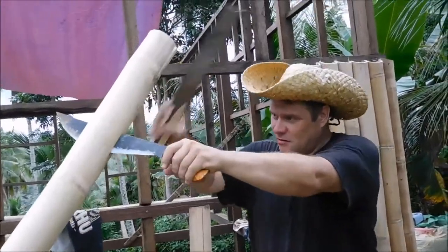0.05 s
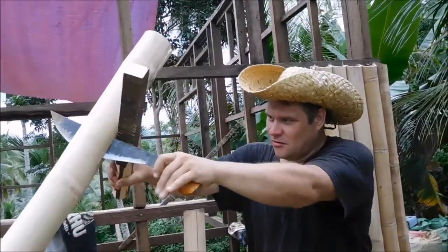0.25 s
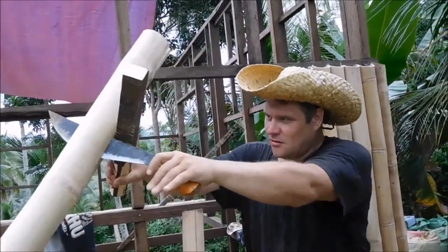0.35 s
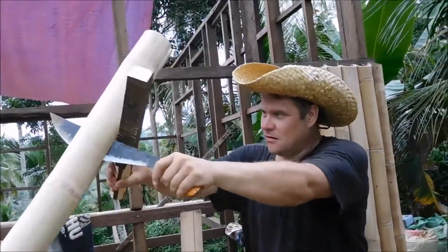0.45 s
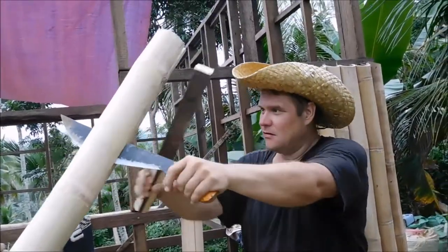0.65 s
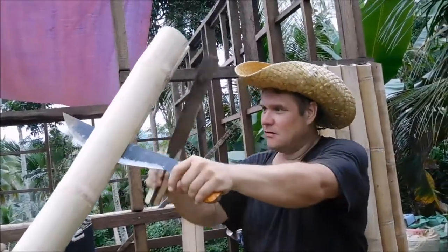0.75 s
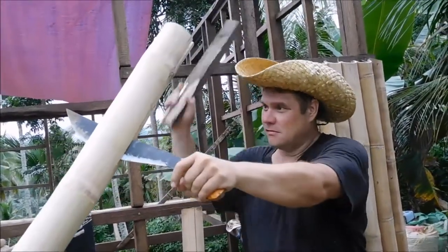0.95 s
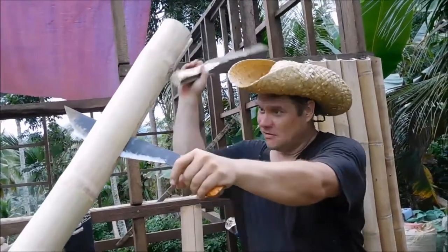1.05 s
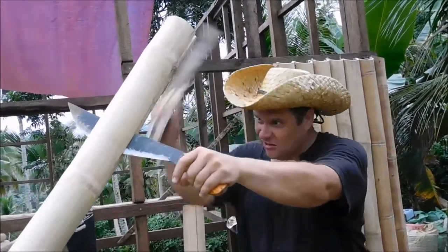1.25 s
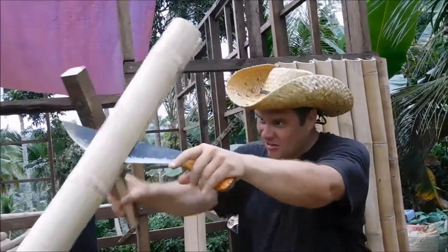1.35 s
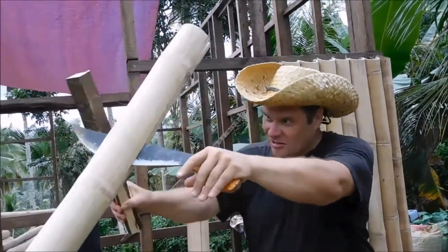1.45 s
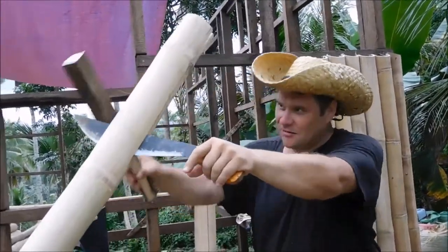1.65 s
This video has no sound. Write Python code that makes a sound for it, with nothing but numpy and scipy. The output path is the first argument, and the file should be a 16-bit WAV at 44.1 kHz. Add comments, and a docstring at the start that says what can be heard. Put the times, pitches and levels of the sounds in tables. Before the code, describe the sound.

Two sharp wooden knocks on a blade wedged in a bamboo pole, about a second apart, heard close outdoors. A hollow knock comes first, then a splitting crack with a short metallic ring, over a faint hush and thin insect hiss.

```python
"""First comes the hush of a quiet yard, with thin insect hiss and a faint handling rustle.
Then a wooden block strikes a knife blade lodged in a bamboo pole, twice. The first blow drives the
blade in and sounds the hollow pole. The second cracks harder, splits the pole so it rings lower,
leaves the blade ringing and ends in dull knocks. Nearby walls and timber scatter the sound,
and the close microphone overloads on each blow."""
import sys
import numpy as np
from scipy import signal
from scipy.io import wavfile

SR = 44100
rng = np.random.default_rng(int(sys.argv[2]) if len(sys.argv) > 2 else 0)


def to_wav(s):
    """Save 16-bit WAV."""
    ch = np.atleast_2d(s).T  # columns
    pcm = np.round(np.clip(ch, -1, 1) * 32767)  # PCM
    wavfile.write(sys.argv[1], SR, pcm.astype(np.int16))


N = 74970


def from_db(db):
    """Turn decibels into a number to multiply by."""
    return 10 ** (np.asarray(db) / 20)


def rms_one(x):
    """Scale a signal so its average strength (rms) is one."""
    return x / np.sqrt(np.mean(x ** 2) + 1e-20)


def at_hz(table, hz, column=1):
    """Read between a table's rows, spacing octaves evenly."""
    table = np.array(table)
    return np.interp(np.log(hz), np.log(table[:, 0]), table[:, column])


def pan_left(db):
    """Turn the left side up and the right side down by db."""
    return from_db([[db], [-db]])


def fade(start, t60):
    """Jump to one at start, then die away by 60 dB every t60 seconds."""
    age = np.arange(N) / SR - start
    return (age >= 0) * from_db(-60 * np.maximum(age, 0) / t60)


def drift(hz):
    """A slow random wander, about one in size."""
    r = np.exp(-2 * np.pi * hz / SR)
    return rms_one(signal.lfilter([1], [1, -2 * r, r * r], rng.standard_normal(2 * N))[N:])


def ring(push, hz, t60):
    """Each push starts a pure tone that dies away."""
    decay, turn = from_db(-60 / (t60 * SR)), 2 * np.pi * hz / SR
    return signal.lfilter([0, np.sin(turn)], [1, -2 * decay * np.cos(turn), decay ** 2], push + 1e-18)


def struck(times, levels_db, tones):
    """One click per contact rings all of an object's natural tones."""
    clicks = np.zeros(N)
    clicks[(times * SR).astype(int)] = from_db(levels_db)
    return sum((-1) ** k * from_db(db) * ring(clicks, hz, t60) for k, (hz, db, t60) in enumerate(tones))


def half_octave(x, hz):
    """Keep a band half an octave wide around hz."""
    half = 2 ** .25
    return signal.sosfilt(signal.butter(2, [hz / half, hz * half], "band", fs=SR, output="sos"), x)


def noise_bands(likeness):
    """Stereo noise, band by band; likeness 1 makes left and right equal, 0 unrelated."""
    white = rng.standard_normal((2, 2, N))
    for k, hz in enumerate(30 * 2 ** (np.arange(19) / 2)):
        mid, side = half_octave(white[k % 2], hz)
        alike = np.clip(at_hz(likeness, hz), -1, 1)
        yield hz, np.sqrt((1 + alike) / 2) * mid + np.sqrt((1 - alike) / 2) * side * [[1], [-1]]


# tone colour of the outdoor hush: f/Hz, level/dB
HUSH_COLOUR = [(25, 3), (45, -5), (100, -6.5), (250, -10.5), (450, -11.5), (950, -10), (1500, -13.5),
               (3000, -17), (6500, -25), (10500, -28), (15500, -32.5)]
# how alike the hush is in both ears: f/Hz, likeness
HUSH_LIKENESS = [(60, 0.92), (240, 0.56), (950, 0.45), (3770, -0.14), (15000, 0.016)]
def hush(level_db=-49.5, flicker_db=1.2):
    """The hush of the yard wavers slightly in each band."""
    bands = (from_db(at_hz(HUSH_COLOUR, hz) + flicker_db * drift(hz=14)) * band
             for hz, band in noise_bands(HUSH_LIKENESS))
    return from_db(level_db) * rms_one(sum(bands))


def insects(hz=10650, width_hz=760, level_db=-67.5):
    """Distant insects make a thin, steady hiss."""
    band = signal.butter(2, [hz - width_hz / 2, hz + width_hz / 2], "band", fs=SR, output="sos")
    return from_db(level_db) * rms_one(signal.sosfilt(band, rng.standard_normal((2, N))))


# faint ticks and rustles: t/s, level/dB, f/Hz, fade time/s, hiss compared with ring/dB
SCUFFS = [(0.04, -55, 3200, .4, -7), (0.722, -55, 7500, .04, 5), (0.76, -56, 4500, .25, -5),
          (1.234, -42, 3050, .035, -3)]
def handling():
    """Handling makes tiny scuffs: hiss with one blurry ringing pitch."""
    out = 0
    for start, db, hz, t60, hiss_db in SCUFFS:
        hiss = rng.standard_normal((2, N))
        ringing = rms_one(ring(hiss, hz, t60=.005))
        out += from_db(db) * fade(start, t60) * (ringing + from_db(hiss_db) * hiss)
    return out


# natural tones of the hollow pole before it splits: f/Hz, level/dB, fade time/s
POLE_TONES = [(626.4, -16.5, .19), (673, -21, 0.179), (709, -9.5, .14), (722.5, -31, .7),
              (770.3, -7, 0.094), (932, -3, 0.076), (1032, -16, 0.11), (1109, -16, 0.1)]
def pole(times, levels_db, split_s=1.3, split_pitch=.885):
    """The bamboo rings at one pitch while whole, and lower once the second blow splits it."""
    split = times > split_s
    lowered = [(hz * split_pitch, db, t60) for hz, db, t60 in POLE_TONES]
    whole = struck(times[~split], levels_db[~split], POLE_TONES)
    return whole + struck(times[split], levels_db[split], lowered)


# how alike the close bursts are in both ears: f/Hz, likeness
BURST_LIKENESS = [(60, 1), (700, 1), (2000, 0.83), (5000, 0.26), (14000, 0.48)]
def bursts(times, levels_db, colour, t60):
    """Many crowded, short-lived tones blur into a burst of noise at each contact."""
    noise = rms_one(sum(from_db(at_hz(colour, hz)) * band for hz, band in noise_bands(BURST_LIKENESS)))
    power = sum((from_db(db) * fade(start, t60)) ** 2 for start, db in zip(times, levels_db))
    return noise * np.sqrt(power)


# contacts within the two blows: t/s, then level/dB of pole, block, blade, crack, rasp, thump
BLOW_CONTACTS = [(0.2015, -21.5, -8, -38, -25, -12, -37.5), (0.2023, -31.5, -6.5, -28, -25, -7, -35),
                 (0.2070, 3, -12.5, -28, -31, -11, -16.5), (0.2172, -21, -12.5, -44, -28, -17, -37),
                 (1.3938, -13, -40, -57, -34, -24, -49), (1.3979, -7, -5, -4, 0, -9.5, -21.5),
                 (1.4056, -29, -20.5, -1, -13.5, -13, -18.5)]
# natural tones: f/Hz, level/dB, fade time/s
BLOCK_TONES = [(1460, -7, 0.083), (1622, -1.5, 0.066), (1770, -3.5, .04), (2074, -9.5, 0.043),
               (2130, -14.5, .04), (2240, -36, 0.039), (2473, -9.5, 0.095), (2624, -9, 0.07),
               (2940, -28, 0.026), (3210, -31, 0.028), (3293, -12, 0.033), (3940, -23.5, 0.0097)]  # the wooden block
BLADE_TONES = [(1046, -15, 0.086), (1499, -18, 0.4), (1513, -8, 0.091), (1510, -34, 1), (1533.7, -31, 0.73),
               (1562, -28.5, 0.41), (2589, -33.5, 0.071)]  # the wedged blade; close tones throb together
THUMP_TONES = [(59, 0.5, 0.05), (139.5, -3, 0.044), (306.6, -6, 0.097), (416, -5, 0.029)]  # the pole and its support swaying briefly
# tone colours of the noise: f/Hz, level/dB
CRACK_COLOUR = [(200, -18), (700, 2), (1500, -1.5), (2700, -6.5), (4500, 1.5), (6500, -17), (11000, -13),
                (16000, -34.5)]
RASP_COLOUR = [(200, -14.5), (600, -4.5), (1100, -1), (1700, 2), (2700, -4.5), (3800, -9.5), (6000, -21.5),
               (14000, -25.5)]
def blows():
    """Each contact rings pole, block and blade, with a crack, a rasp of splitting fibres and a thump."""
    times, pole_db, block_db, blade_db, crack_db, rasp_db, thump_db = np.transpose(BLOW_CONTACTS)
    block = struck(times, block_db, BLOCK_TONES)
    blade = struck(times, blade_db, BLADE_TONES)
    thump = struck(times, thump_db, THUMP_TONES)
    crack = bursts(times, crack_db, CRACK_COLOUR, t60=.027)
    rasp = bursts(times, rasp_db, RASP_COLOUR, t60=.078)
    return pole(times, pole_db) + block + blade + thump + crack + rasp


# dull knocks after the second blow: t/s, level/dB
KNOCK_CONTACTS = [(1.435, -23), (1.449, -23.5), (1.455, -20), (1.465, -24.5), (1.474, -29)]
# their tone colour: f/Hz, level/dB
KNOCK_COLOUR = [(40, -42), (150, -5.5), (300, -9), (550, 2), (850, 5), (1200, -12), (3000, -30),
                (10000, -50)]
def knocks(pole_offset_db=-1):
    """The block glances off along the pole in a quick run of soft knocks."""
    times, db = np.transpose(KNOCK_CONTACTS)
    return bursts(times, db, KNOCK_COLOUR, t60=.063) + pole(times, db + pole_offset_db)


def echo_shape(table, hz, delay_s):
    """How a cluster of echoes starts and fades in one band."""
    shape = fade(delay_s, at_hz(table, hz, column=2))
    return from_db(at_hz(table, hz)) * shape / np.linalg.norm(shape)


# how alike all the yard's echoes are in both ears: f/Hz, likeness
YARD_LIKENESS = [(60, .9), (300, .6), (700, 0.85), (1500, 0.1), (4000, 0), (14000, .1)]
# the earliest echoes: f/Hz, level/dB, fade time/s
TIMBER_ECHOES = [(60, -21, 0.098), (401.6, -7.5, 0.096), (890, -14, 0.034), (2000, -11.5, 0.034),
                 (4970, -8, 0.064), (14200, -11, 0.03)]
def near_echoes(x):
    """Sound bounces off timber close by and keeps the pitch of the blow."""
    echoes = sum(band * echo_shape(TIMBER_ECHOES, hz, delay_s=.002)
                 for hz, band in noise_bands(YARD_LIKENESS))
    return signal.fftconvolve(x[None], echoes, axes=1)[:, :N]


# later echoes: f/Hz, level/dB, fade time/s
YARD_TAIL = [(60, -25, 0.42), (250, -13.5, 0.3), (696, -19, 0.64), (1390, -17.5, 0.62), (2670, -15, 0.55),
             (6000, -11, 0.42), (14000, -14.5, 0.55)]  # scattered all round the yard
WALL_CLUSTER = [(60, -26, 0.11), (250, -15.5, 0.12), (800, -32.5, 0.066), (2490, -19.5, 0.064),
                (14000, -27.5, 0.089)]  # from one wall some way off
def far_echoes(x):
    """Leaves and walls return each band's energy as a dense tail with no pitch."""
    out = 0
    for hz, band in noise_bands(YARD_LIKENESS):
        tail = echo_shape(YARD_TAIL, hz, delay_s=.011)
        wall = echo_shape(WALL_CLUSTER, hz, delay_s=.051)
        power = signal.fftconvolve(half_octave(x, hz) ** 2, tail ** 2 + wall ** 2)[:N]
        out += rms_one(band) * np.sqrt(np.abs(power))
    return out


def scene():
    """Mix the close work, its echoes and the outdoor background."""
    work = blows() + knocks() + handling()
    mono = work.mean(axis=0)
    echoes = near_echoes(mono) + far_echoes(mono)
    return pan_left(1.2) * work + pan_left(.9) * echoes + pan_left(.62) * (hush() + insects())


def record(dry, hardness=6.6, crackle_db=-20, crackle_hz=3000, cutoff_hz=16000):
    """The overloaded microphone flattens the loudest peaks and crackles; the highest treble is cut."""
    flattened = dry / (1 + np.abs(dry) ** hardness) ** (1 / hardness)
    bass_cut = signal.butter(1, crackle_hz, "high", fs=SR, output="sos")
    grit = signal.sosfilt(bass_cut, rng.standard_normal((2, N)))
    crackle = from_db(crackle_db) * np.tanh(np.abs(dry - flattened)) * grit
    treble_cut = signal.ellip(10, .1, 70, cutoff_hz, fs=SR, output="sos")
    return signal.sosfilt(treble_cut, flattened + crackle)


dry = scene()
out = record(dry)
to_wav(out)
```